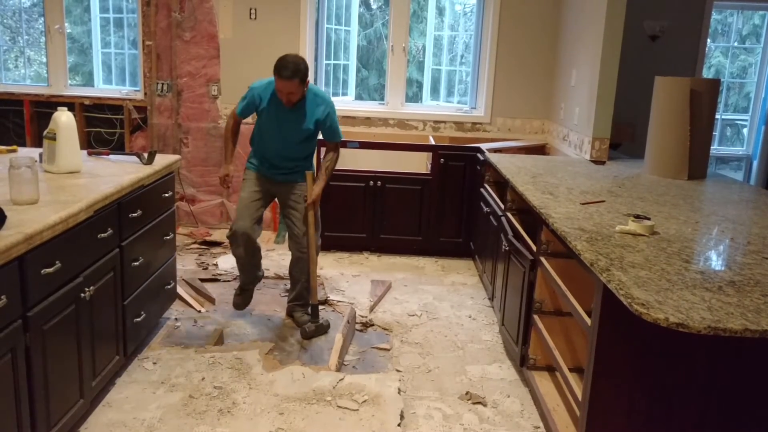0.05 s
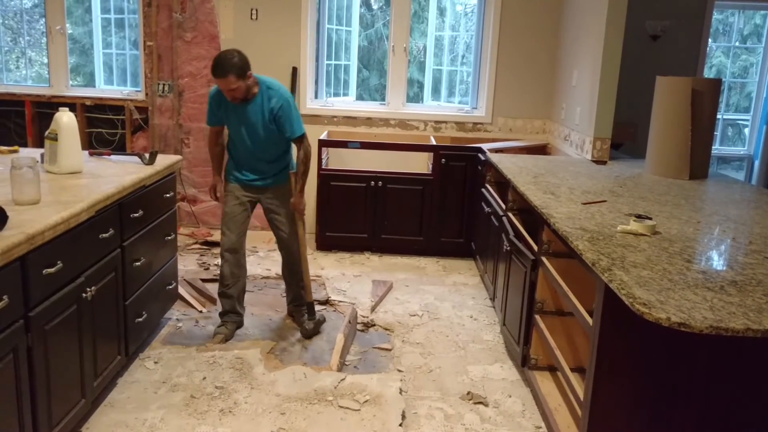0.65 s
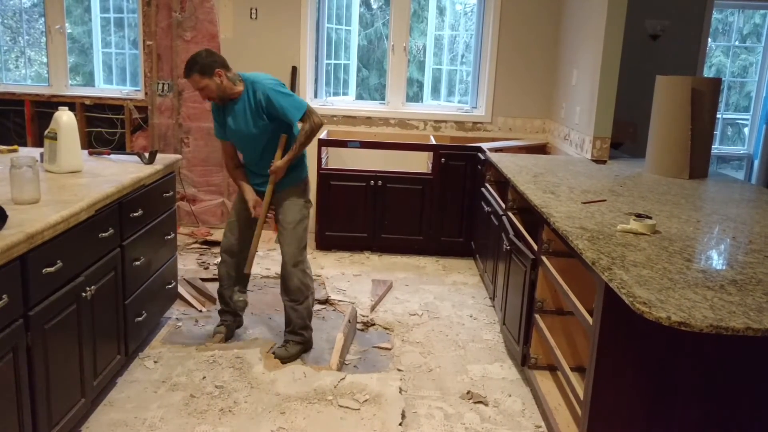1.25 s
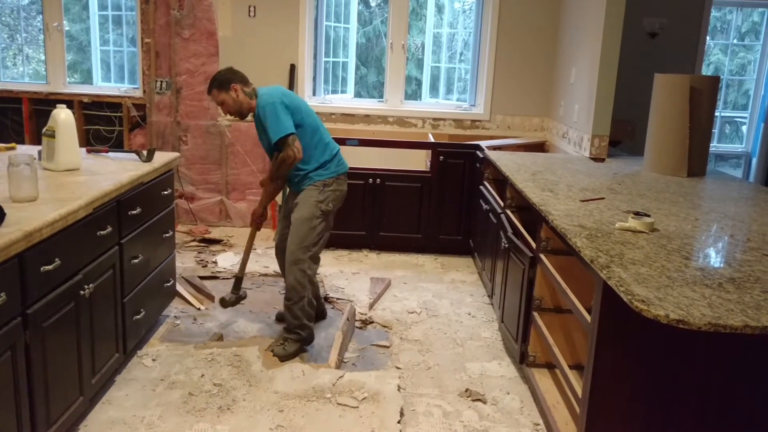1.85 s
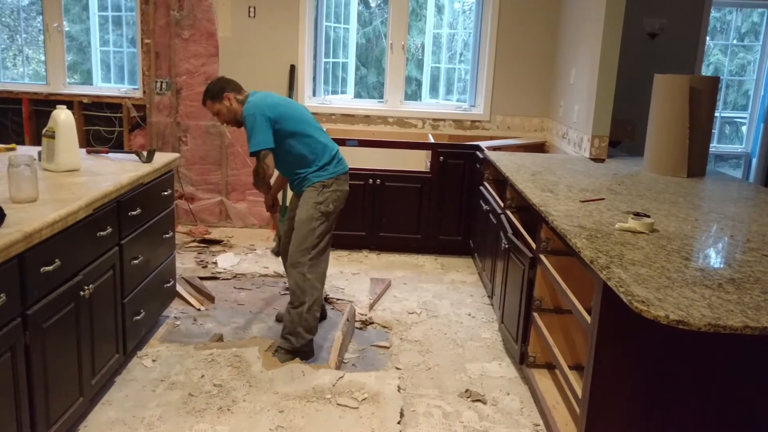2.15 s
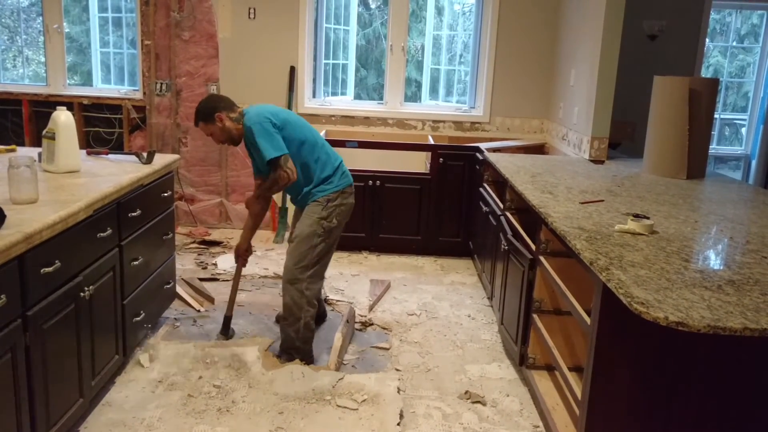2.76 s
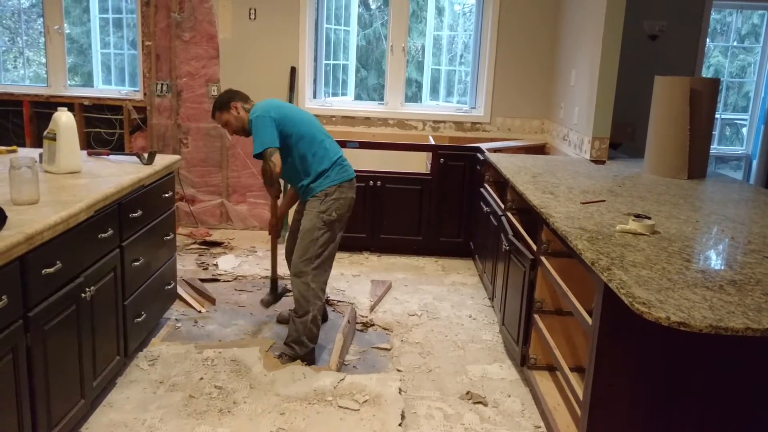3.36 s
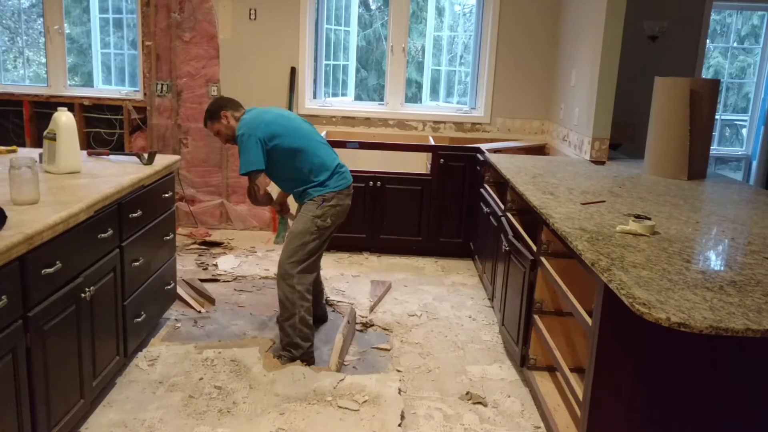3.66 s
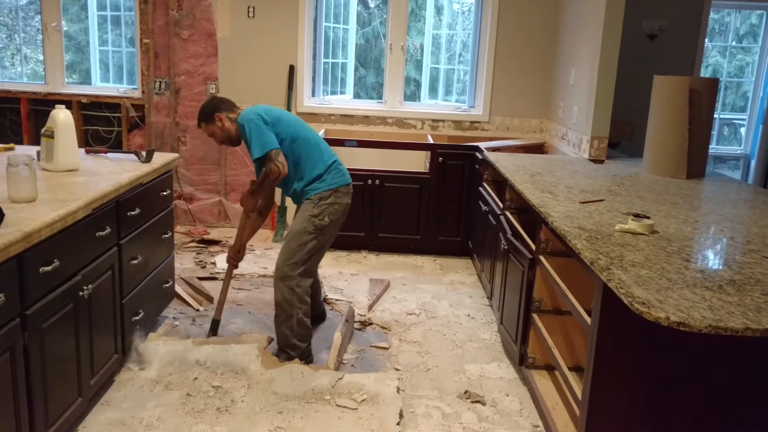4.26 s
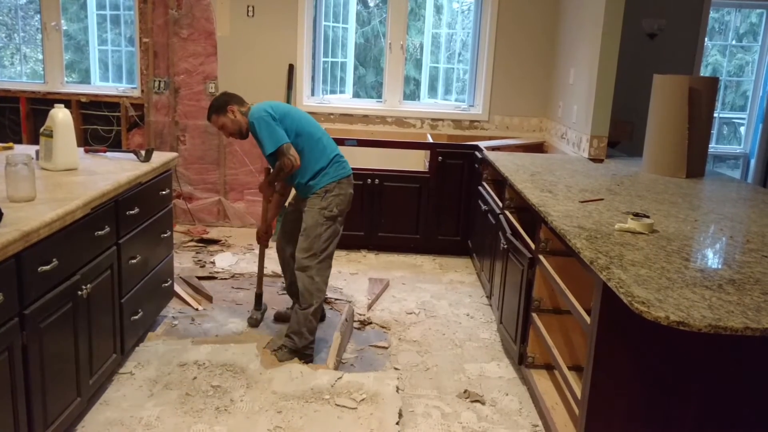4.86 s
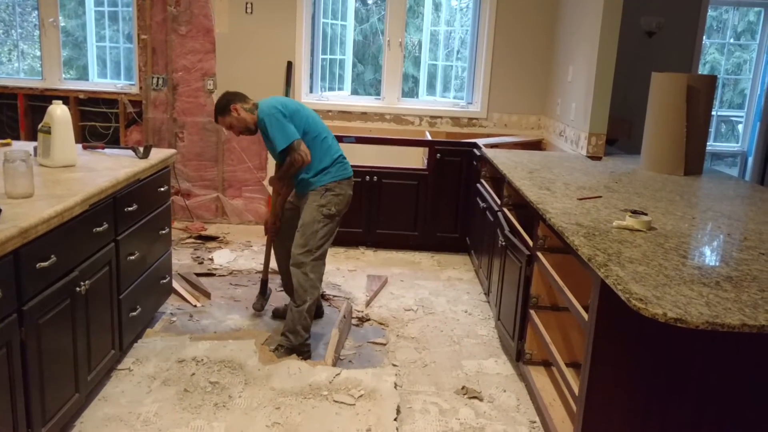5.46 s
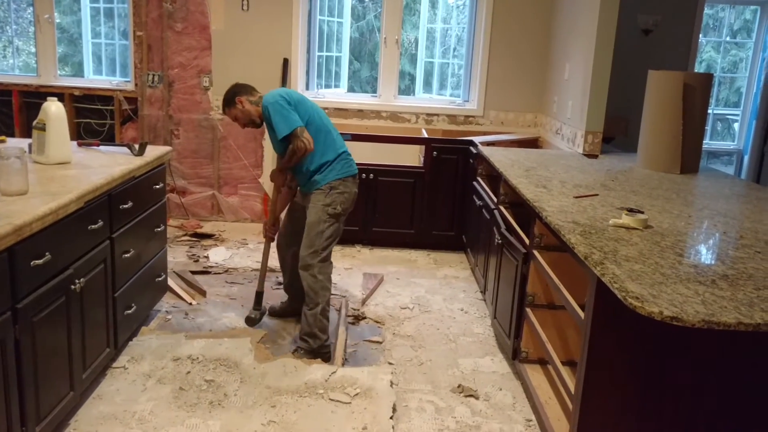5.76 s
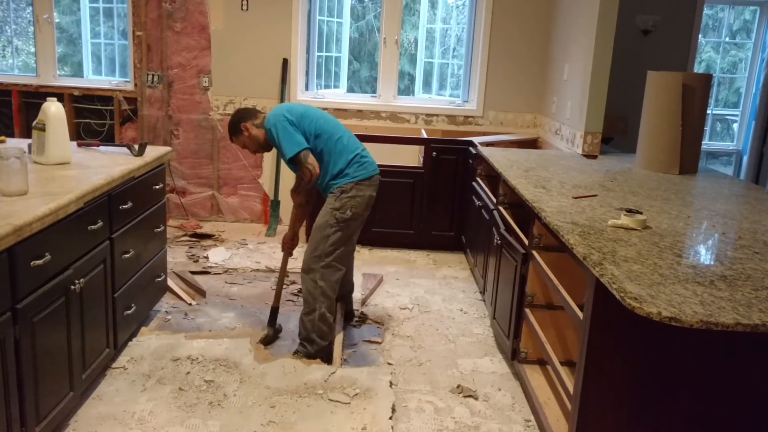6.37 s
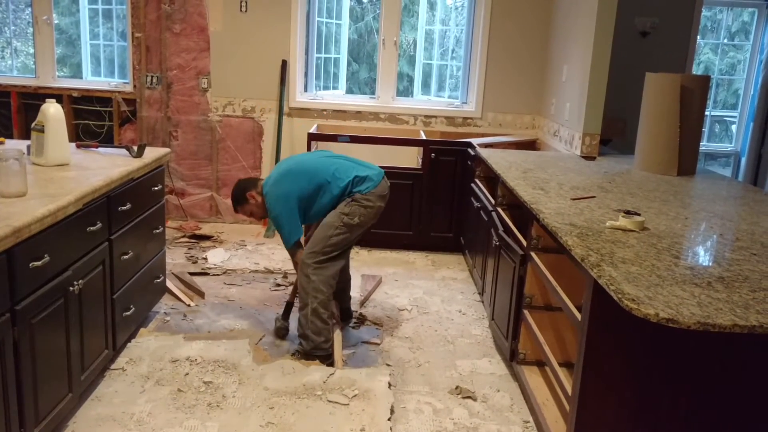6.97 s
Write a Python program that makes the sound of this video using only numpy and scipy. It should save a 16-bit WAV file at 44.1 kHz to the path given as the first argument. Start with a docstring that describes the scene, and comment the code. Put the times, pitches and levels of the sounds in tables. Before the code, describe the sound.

In a bare, echoing kitchen, a sledgehammer drives wooden wedges under floor boards. Two sharp blows crack and rattle the loose wood, then a duller third lands, followed by a heavy boot thump. Boots step and drag through grit between and after the blows, and finally the hammer head drops on the floor. A steady fan-like rush dips at each hard hit and slowly swells back.

```python
"""A sledgehammer drives wooden wedges under the floor boards of a stripped, echoing kitchen.
At each blow the loosened wood rattles, the head rebounds and taps once more, and splinters patter down.
In between, boots land heel then sole and drag through grit, over a steady fan-like rush; at last the
head is dropped on the floor. A gain control ducks at hard blows and lets the rush swell back slowly."""
import sys
import numpy as np
from scipy import signal
from scipy.fft import rfft, irfft, next_fast_len
from scipy.io import wavfile
from scipy.ndimage import uniform_filter1d

SR = 44100
rng = np.random.default_rng(int(sys.argv[2]) if len(sys.argv) > 2 else 0)


def master(y):
    """Save y as 16-bit WAV."""
    cut = np.clip(np.atleast_2d(y).T, -1, 1)
    pcm = np.round(cut * 32767)  # scale
    wavfile.write(sys.argv[1], SR, pcm.astype(np.int16))


N = 313987
REVERB_SIZE, SHOT_SIZE = 40000, 12288   # samples in the room response and in a dry one-shot


def from_db(db):
    """Decibels to gain."""
    return 10 ** (np.asarray(db) / 20)


def at_hz(points, hz):
    """Read a curve on a log-frequency axis."""
    known_hz, values = np.transpose(points)
    return np.interp(np.log(np.maximum(hz, 1)), np.log(known_hz), values)


def unit_energy(x):
    """Scale to an average energy of one per channel."""
    return x / np.sqrt(np.mean(np.sum(x ** 2, axis=-1)) + 1e-20)


def low_pass(x, hz):
    """Roll off the top at 12 dB per octave."""
    return signal.sosfilt(signal.butter(2, min(hz, .45 * SR), fs=SR, output="sos"), x)


def high_pass(x, hz, order=2):
    """Roll off the low end."""
    return signal.sosfilt(signal.butter(order, hz, "high", fs=SR, output="sos"), x)


def fade(t60, size=SHOT_SIZE):
    """An exponential decay from 1."""
    return np.exp(-np.log(1000) * np.minimum(np.arange(size) / SR / t60, 2))


def mode(hz, t60):
    """A struck resonance."""
    return np.sin(2 * np.pi * hz * np.arange(SHOT_SIZE) / SR) * fade(t60)


def noise(spectrum, tilt_db=0):
    """Mono noise of rms 1 with the given colour, tilted per octave."""
    hz = np.fft.rfftfreq(SHOT_SIZE, 1 / SR)
    gain = from_db(at_hz(spectrum, hz) + tilt_db * np.log2(np.maximum(hz, 1)))
    return np.sqrt(SHOT_SIZE) * unit_energy(irfft(rfft(rng.standard_normal(SHOT_SIZE)) * gain))


def click(spectrum):
    """The tightest transient that has the given colour (minimum phase)."""
    hz = np.fft.rfftfreq(SHOT_SIZE, 1 / SR)
    cepstrum = irfft(np.log(from_db(at_hz(spectrum, hz))))
    cepstrum[1:SHOT_SIZE // 2] *= 2
    cepstrum[SHOT_SIZE // 2 + 1:] = 0
    return irfft(np.exp(rfft(cepstrum)))


# stereo width of the ambience: (frequency [Hz], side minus mid [dB])
STEREO_WIDTH = [(100, 2), (300, -9), (550, -5.5), (1000, -9), (1600, 3), (4000, 0)]
def diffuse(size):
    """Frequencies and flat stereo spectrum of sound that arrives from all sides."""
    hz = np.fft.rfftfreq(size, 1 / SR)
    mid, side = rfft(rng.standard_normal((2, size)))
    width = from_db(at_hz(STEREO_WIDTH, hz))
    return hz, (mid + width * side * [[1], [-1]]) / np.sqrt(1 + width ** 2)


# colour of the air bed: (frequency [Hz], level [dB])
FAN_SPECTRUM = [(25, -41), (50, -12.5), (80, -5.5), (130, -5), (230, -3.5), (390, 3), (550, 0), (1100, -3),
                (1700, -3), (2600, -8.5), (4500, -14.5), (7000, -22.5), (10000, -30), (15000, -40.5)]
def fan(level_db=-24):
    """A steady rush of moving air fills the room."""
    size = next_fast_len(N)
    hz, field = diffuse(size)
    rush = irfft(field * from_db(at_hz(FAN_SPECTRUM, hz)), size)[:, :N]
    return from_db(level_db) * np.sqrt(N) * unit_energy(rush)


# reverb decay of the bare room: (frequency [Hz], t60 [s])
REVERB_DECAY = [(60, 0.48), (250, 0.49), (700, 0.69), (2000, 0.56), (6000, 0.72), (14000, 0.44)]
def kitchen(direct_db=-7, early_db=-5, early_t60=.077, build_up_s=.00043):
    """Room response: the direct path, early echoes off the cabinets, and a tail that dies by band."""
    hz, field = diffuse(REVERB_SIZE)
    centres, t60s = np.transpose(REVERB_DECAY)
    bands = [at_hz(np.c_[centres, share], hz) for share in np.eye(len(centres))]
    tail = sum(irfft(field * band) * fade(t60, REVERB_SIZE) for band, t60 in zip(bands, t60s))
    early = irfft(diffuse(REVERB_SIZE)[1]) * fade(early_t60, REVERB_SIZE)
    build_up = np.minimum(np.arange(REVERB_SIZE) / SR / build_up_s, 1) ** 2
    response = unit_energy(tail * build_up) + from_db(early_db) * unit_energy(early * build_up)
    response[:, 0] += from_db(direct_db)
    return response


def place(out, s, level_db, sound, room, window_s=.027):
    """Play a one-shot in the room at time s, with its loudest moment at the given rms level."""
    wet = signal.fftconvolve(sound[None], room, axes=1)[:, :REVERB_SIZE]
    power = uniform_filter1d(np.mean(wet ** 2, axis=0), int(window_s * SR))
    gain = from_db(level_db) / np.sqrt(power.max())
    start = max(round(s * SR), 0)
    out[:, start:start + REVERB_SIZE] += gain * wet[:, :N - start]


# colour of a wood chip: (frequency [Hz], level [dB])
CHIP_SPECTRUM = [(500, -17), (2000, 4), (6000, 2), (11000, -5), (15000, -5)]
def chip_ticks(envelope):
    """Small bits of wood tick brightly at each spike of the envelope."""
    return noise(CHIP_SPECTRUM) * envelope


# stray chips: (time [s], level [dB])
CHIP_CUES = [(.823, -43), (.99, -45.5), (2.23, -28.5), (2.311, -32.5), (7.008, -39)]
def snapping_chips():
    """Single chips snap, one short tick each."""
    for s, level_db in CHIP_CUES:
        yield s, level_db, chip_ticks(fade(t60=.0062))


def splinters(per_s=110, shower_t60=.6, length_s=.15, spread_db=4, tick_t60=.012):
    """A short, fading shower of chips, each with a size of its own."""
    t = np.arange(SHOT_SIZE) / SR
    sizes = from_db(spread_db * np.clip(rng.standard_normal(SHOT_SIZE), -2, 2))
    lands = rng.random(SHOT_SIZE) < per_s / SR
    lands[0] = True
    hits = sizes * lands * (t < length_s) * fade(shower_t60)
    return chip_ticks(signal.fftconvolve(hits, fade(tick_t60))[:SHOT_SIZE])


# colour of sliding grit: (frequency [Hz], level [dB])
GRIT_SPECTRUM = [(100, -25), (350, 3), (1800, 4), (3500, 2), (7000, -6.5), (10500, -8.5), (15000, -17)]
def scrape(length_s, tilt_db=0, catches_per_s=500, rough_db=6, edge_s=.0017):
    """Grit catches and slips many times during one stroke."""
    t = np.arange(SHOT_SIZE) / SR
    stroke = np.clip(np.minimum(t, length_s - t) / edge_s, 0, 1)
    catches = np.clip(rng.standard_normal(SHOT_SIZE), -2, 2)[(t * catches_per_s).astype(int)]
    return noise(GRIT_SPECTRUM, tilt_db) * stroke * from_db(rough_db * catches)


# strokes along the floor: (time [s], length [s], level [dB])
DRAG_CUES = [(1.427, 0.32, -27.5), (4.999, 0.047, -27), (5.603, 0.29, -28), (6.169, .26, -30.5),
             (6.619, 0.22, -24.5)]
def drags():
    """Boots and hammer head drag through grit, darker than a scuff."""
    for s, length_s, level_db in DRAG_CUES:
        yield s, level_db, scrape(length_s, tilt_db=-1.4)


# modes of the subfloor on its joists: (frequency [Hz], level [dB], t60 [s])
SUBFLOOR_MODES = [(84, -23, 0.11), (138.3, 1.5, 0.092), (156.4, -14.5, 0.38), (171.6, -5.5, 0.095),
                  (266, -6, 0.073), (312.5, -6, 0.15), (392, -10, 0.058)]
def floor_boom(spread_db=4.5, radiates_from_hz=120):
    """The subfloor rings; each spot favours different modes, and long waves barely radiate."""
    spot_db = rng.normal(0, spread_db, len(SUBFLOOR_MODES))
    boards = sum(from_db(db + spot_db[k]) * mode(hz, t60) * (-1) ** k
                 for k, (hz, db, t60) in enumerate(SUBFLOOR_MODES))
    return unit_energy(high_pass(boards, radiates_from_hz, order=4))


# colour of a hit on wood: (frequency [Hz], level [dB])
CRACK_SPECTRUM = [(40, -22), (80, -27), (160, 4), (400, 2), (750, 4), (1000, -2.5), (1400, -3.5), (1800, 3),
                  (2300, -9), (3500, -8), (6500, -18.5), (10000, -20), (15000, -28)]
def crack(bright_hz, crunch_db, crunch_t60=.068):
    """One sharp contact, then wood fibres go on crushing; a softer contact is duller."""
    force = from_db(crunch_db) * unit_energy(rng.standard_normal(SHOT_SIZE) * fade(crunch_t60))
    force[0] += 1   # the contact itself
    wood = signal.fftconvolve(force, click(CRACK_SPECTRUM))[:SHOT_SIZE]
    return unit_energy(low_pass(wood, bright_hz))


def thud(knock_db, db_per_octave=8.5):
    """A heavy landing: floor boom plus a dull knock that brightens as it gets louder."""
    bright_hz = 1480 * 2 ** (knock_db / db_per_octave)
    return floor_boom() + from_db(knock_db) * crack(bright_hz, crunch_db=-12)


# boots on the subfloor:
# (time [s], heel level [dB], knock against boom [dB], sole against heel [dB], scuff level [dB])
STEP_CUES = [(1.31, -26.5, -9.5, 0, -29), (1.685, -20, -5, -9, -16.5), (2.267, -23.5, -10.5, 1, -51),
             (4.227, -2.5, -13, -19, -27), (5.712, -21.5, 2.5, -2, -21.5), (6.251, -14, 0, -9, -22.5),
             (6.376, -19, -7.5, -5, -28.5)]
def footsteps(scuff_lead_s=.01, sole_after_s=.061, sole_knock_db=5):
    """The boot slides, the heel lands, and the sole follows with a little more knock."""
    for s, level_db, knock_db, sole_db, scuff_db in STEP_CUES:
        yield s - scuff_lead_s, scuff_db, scrape(length_s=.085)
        yield s, level_db, thud(knock_db)
        yield s + sole_after_s, level_db + sole_db, thud(knock_db + sole_knock_db)


def dropped_head(drop_s=6.7225, drop_db=1, bounce_after_s=.092, bounce_loss_db=21):
    """The hammer head lands and bounces once, a thud with its deep bass cut."""
    for s, level_db in (drop_s, drop_db), (drop_s + bounce_after_s, drop_db - bounce_loss_db):
        yield s, level_db, high_pass(thud(knock_db=-8), hz=135)


def wedge_ring(hz, t60):
    """One short resonance of a struck wedge, with a hard attack."""
    return unit_energy(np.diff(mode(hz, t60), prepend=0))


def wood_hit(hz, ring_db, boom_db, bright_hz, crunch_db):
    """A crack, layered with two short rings of the wood and the floor under it."""
    ring = from_db(ring_db) * wedge_ring(hz, t60=.013)
    clack = from_db(-14.5) * wedge_ring(hz=1653, t60=.014)   # the upper ring that all wedges share
    return crack(bright_hz, crunch_db) + ring + clack + from_db(boom_db) * floor_boom()


def rattle(s, level_db, boom_db, slaps=3, first_gap_s=.0082, slowing=1.22, uneven=.11, rise_db=1.1):
    """Loosened wood slaps back unevenly; the gaps tend to widen and each slap is a touch louder."""
    gaps = first_gap_s * slowing ** np.arange(slaps) * (1 + uneven * rng.standard_normal(slaps))
    for k, after_s in enumerate(np.cumsum(gaps)):
        hz = 1410 * (1 + uneven * rng.standard_normal())
        slap = wood_hit(hz, ring_db=-9, boom_db=boom_db, bright_hz=7950, crunch_db=1.5)
        yield s + after_s, level_db + k * rise_db, slap


# hammer on wedge: (time [s], level [dB], wedge pitch [Hz], ring against crack [dB], brightness [Hz],
# rattle against blow [dB], rebound against blow [dB], splinter flight [s])
BLOW_CUES = [(0.33, 6.5, 865, -12.5, 8000, -4, -20, 0.09), (2.6913, 12.5, 660, -10, 8500, -5.5, -13, .19),
             (4.090, 17, 966, -3, 3930, -21, -20, .265)]
def sledgehammer(rebound_s=.169, splinters_db=-37.5):
    """Steel hits the wedge, the wood rattles, the head comes down again dully, and splinters land."""
    for s, level_db, wedge_hz, ring_db, bright_hz, rattle_db, rebound_db, flight_s in BLOW_CUES:
        boom_db = level_db - 29.5   # heavier blows shake the floor more
        crunch_db = .9 * rattle_db   # a wedge that rattles crushes more fibres
        yield s, level_db, wood_hit(wedge_hz, ring_db, boom_db, bright_hz, crunch_db)
        yield from rattle(s, level_db + rattle_db, boom_db)
        tap = wood_hit(hz=900, ring_db=-6, boom_db=-18, bright_hz=1900, crunch_db=-16)
        yield s + rebound_s, level_db + rebound_db, tap
        yield s + flight_s, level_db + splinters_db, splinters()


def scene():
    """All the work on the floor plays in one room, over the fan."""
    room, out = kitchen(), fan()
    for layer in sledgehammer(), footsteps(), drags(), snapping_chips(), dropped_head():
        for s, level_db, sound in layer:
            place(out, s, level_db, sound, room)
    return out


def widen(x, cross=.65, from_hz=650, lag_samples=17):
    """Above the bass each channel has the other's delayed signal taken off, which combs the centre."""
    size = next_fast_len(N + REVERB_SIZE)
    hz, channels = np.fft.rfftfreq(size, 1 / SR), rfft(x, size)
    leak = cross * hz ** 2 / (hz ** 2 + from_hz ** 2)
    delay = np.exp(-2j * np.pi * hz * lag_samples / SR)
    return irfft(channels - leak * delay * channels[::-1], size)[:, :N]


def gain_control(x, limit_db=-11.5, bass_db=7, window_s=.037, ahead_s=.0025, release_s=4.485):
    """The gain ducks at once when the level passes the limit, bass weighing more, and creeps back."""
    sidechain = np.mean(x ** 2 + (from_db(bass_db) * low_pass(x, hz=527)) ** 2, axis=0)
    size = int(window_s * SR)
    power = np.abs(uniform_filter1d(sidechain, size, origin=(size - 1) // 2))
    cut_db = np.maximum(10 * np.log10(power + 1e-12) - limit_db, 0)
    cut_db[0] = 3   # opens slightly ducked
    t = np.arange(N) / SR
    release, bias_db = np.exp(-t / release_s), 28   # a deep cut recovers faster than a shallow one
    held_db = np.maximum.accumulate((cut_db + bias_db) / release) * release - bias_db
    smooth_db = uniform_filter1d(held_db, int(ahead_s * SR))
    return x * from_db(-np.interp(t + ahead_s, t, smooth_db))


def record(dry, ceiling=.77, low_cut_hz=60, top_cut_hz=15500):
    """Master chain: stereo widening, gain control, a bass cut, soft clipping and a steep top cut."""
    levelled = high_pass(gain_control(widen(dry)), low_cut_hz)
    rounded = ceiling * np.tanh(levelled / ceiling)
    return signal.sosfilt(signal.ellip(10, .1, 80, top_cut_hz, fs=SR, output="sos"), rounded)


dry = scene()
out = record(dry)
master(out)
```